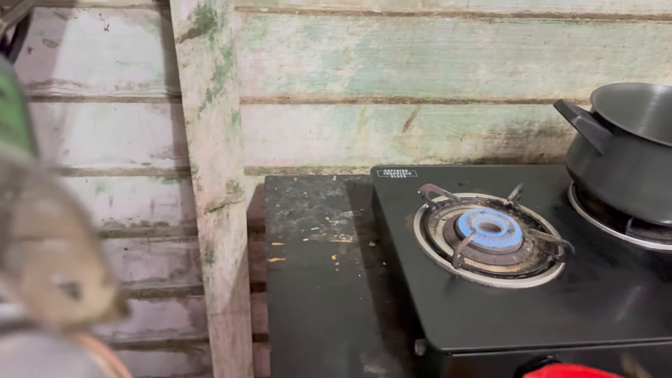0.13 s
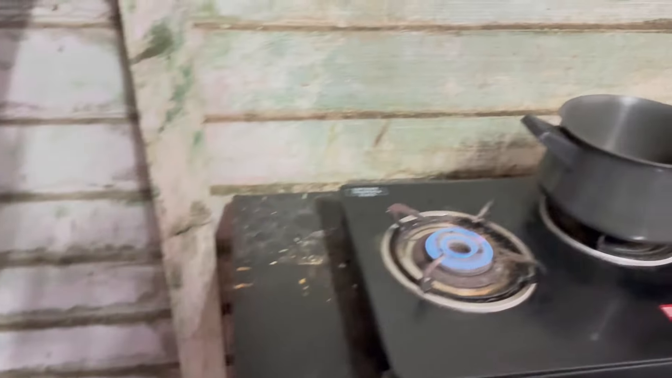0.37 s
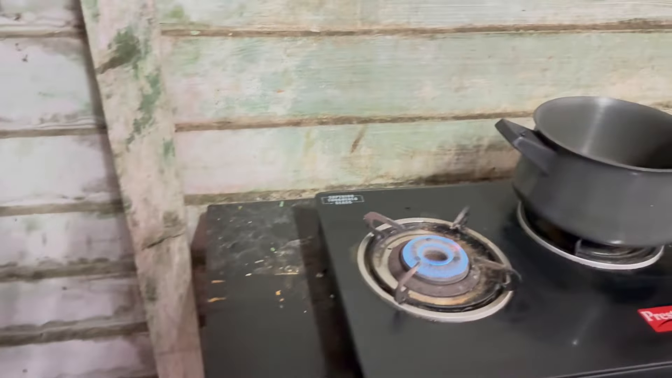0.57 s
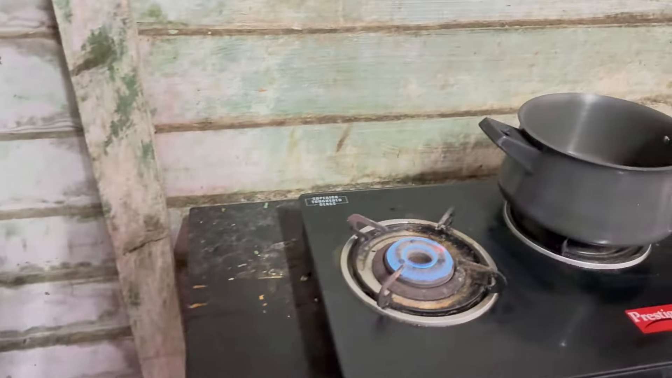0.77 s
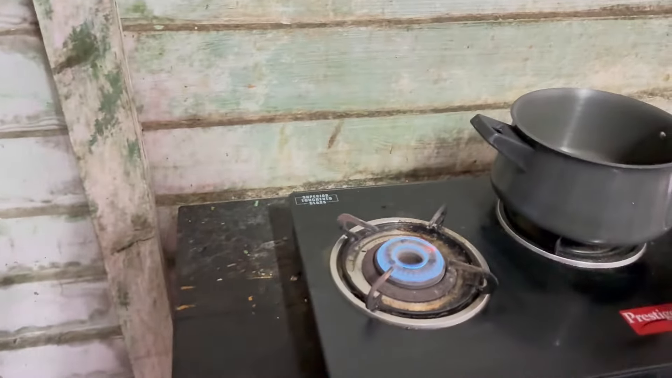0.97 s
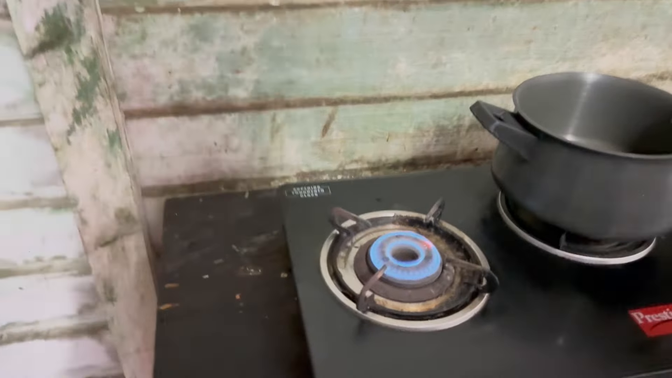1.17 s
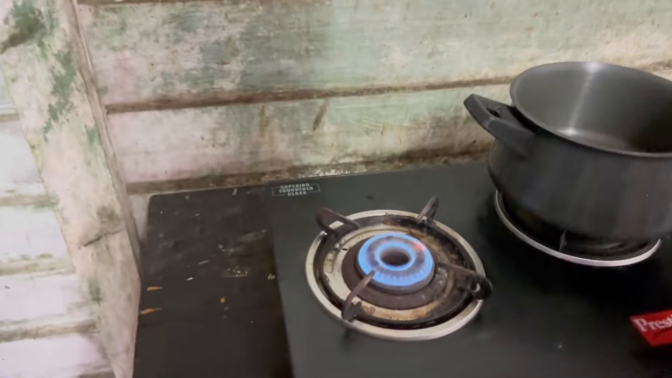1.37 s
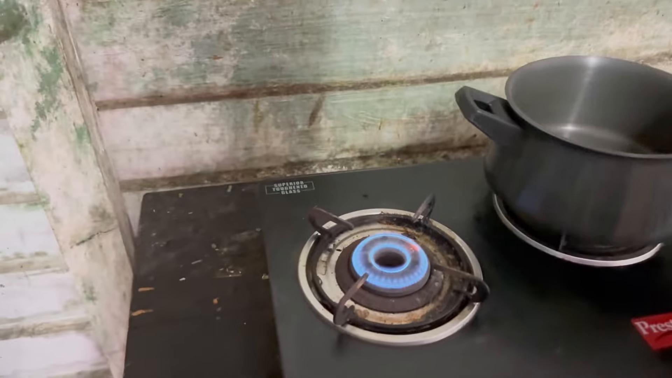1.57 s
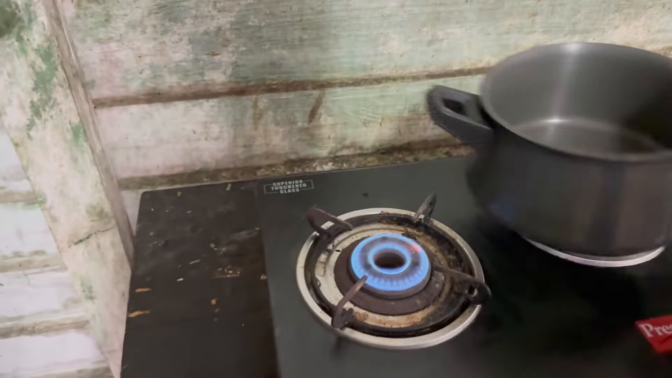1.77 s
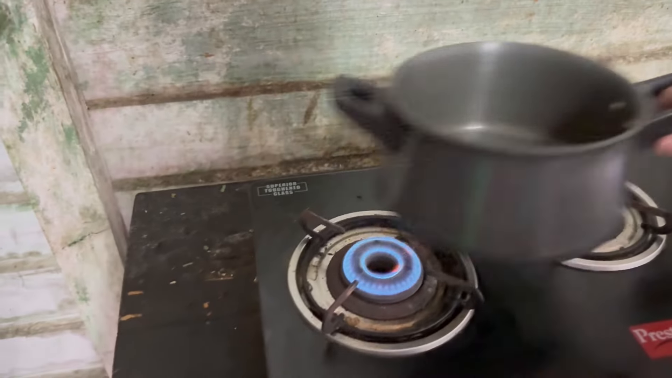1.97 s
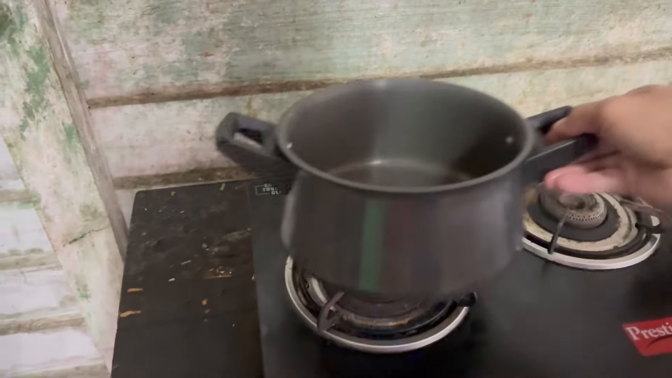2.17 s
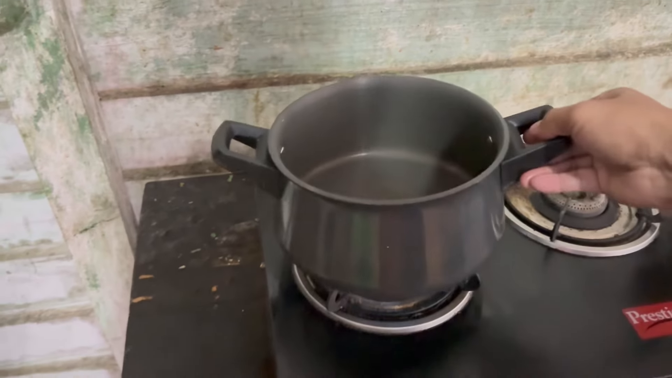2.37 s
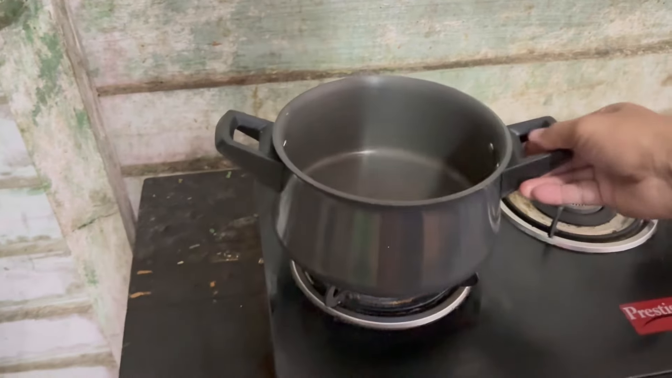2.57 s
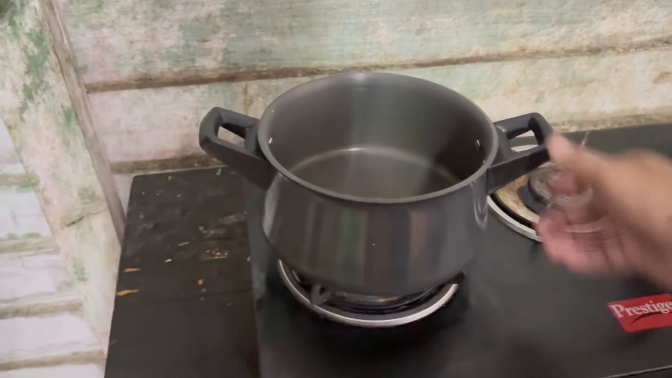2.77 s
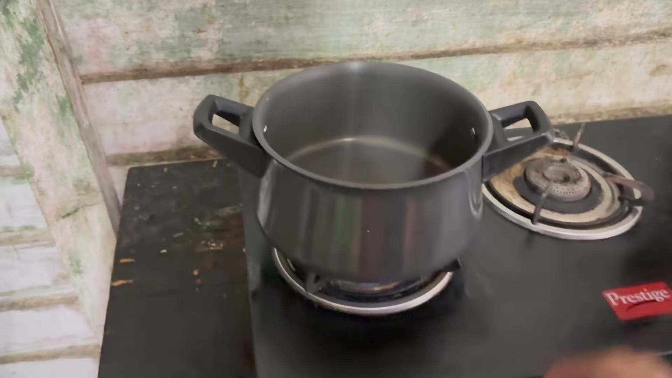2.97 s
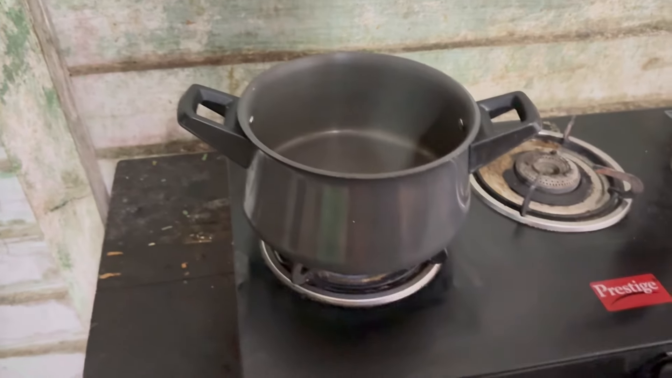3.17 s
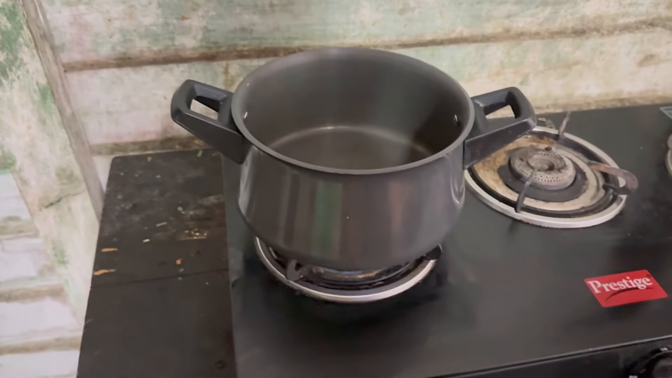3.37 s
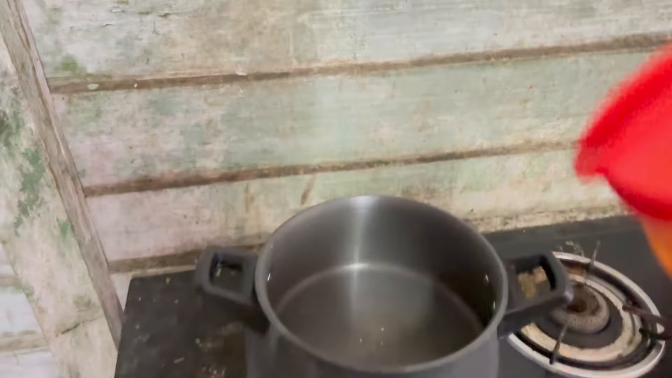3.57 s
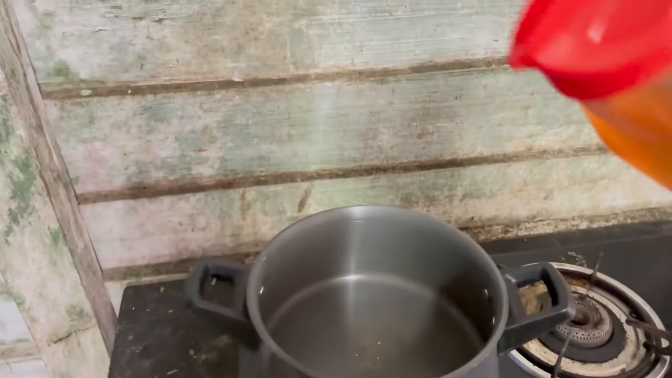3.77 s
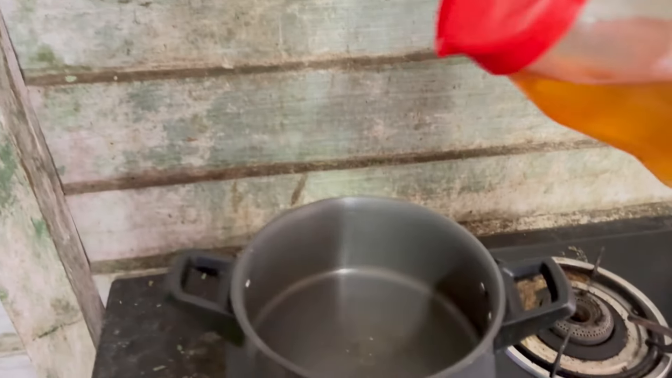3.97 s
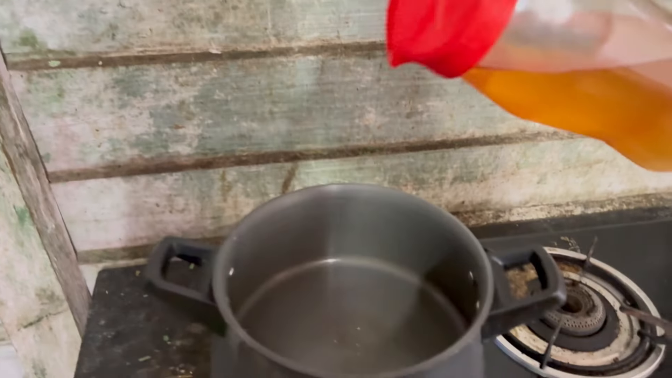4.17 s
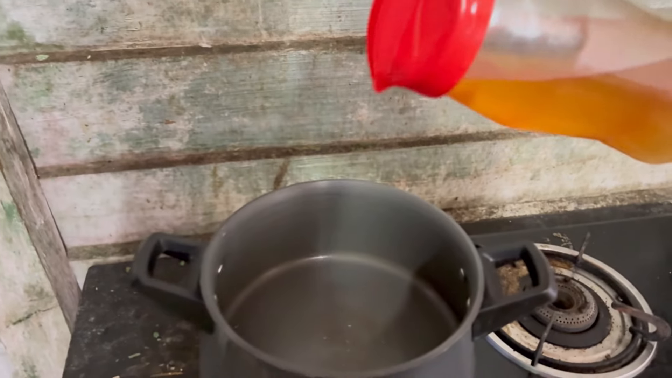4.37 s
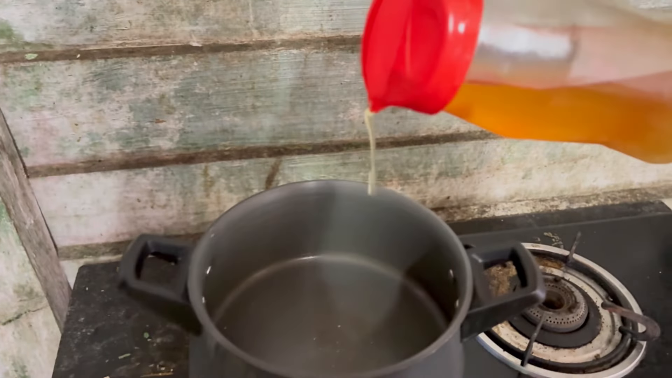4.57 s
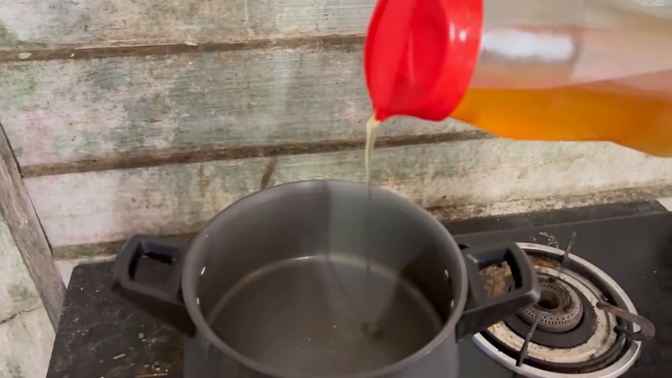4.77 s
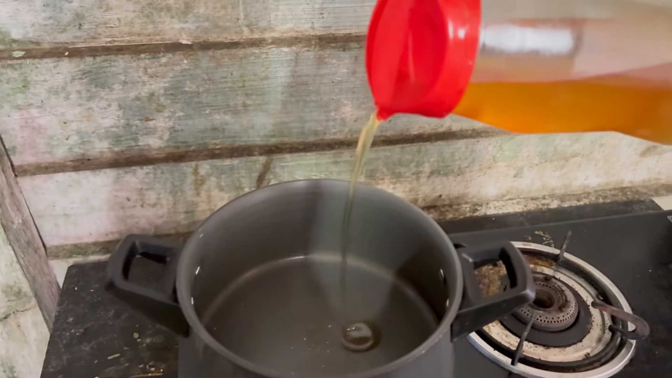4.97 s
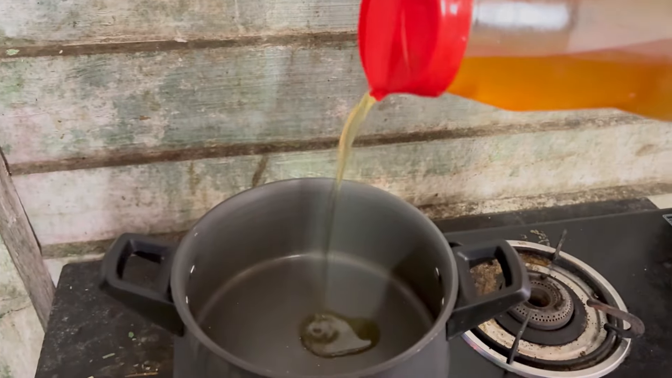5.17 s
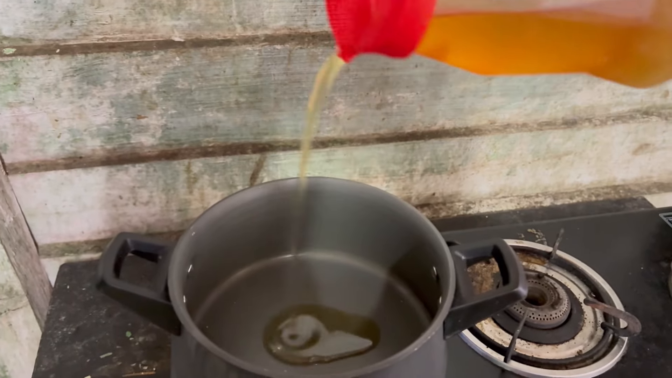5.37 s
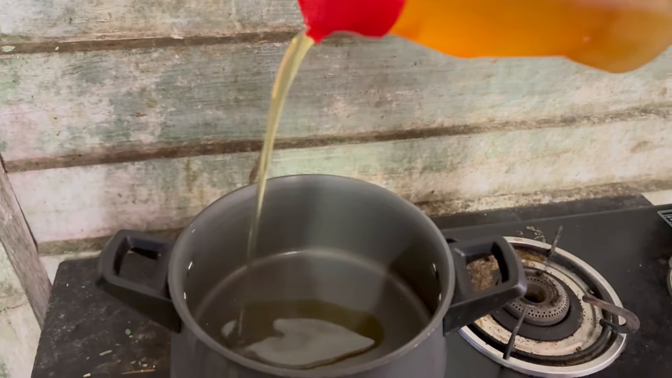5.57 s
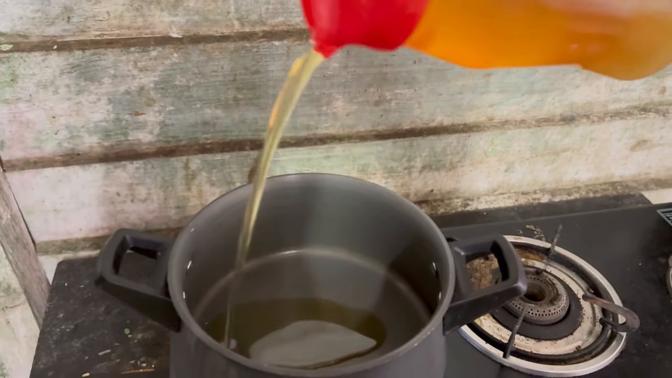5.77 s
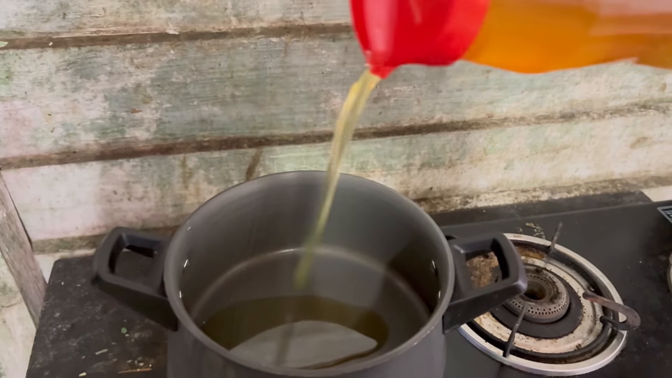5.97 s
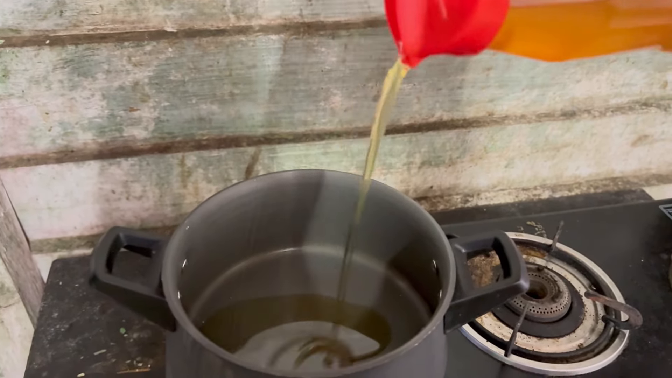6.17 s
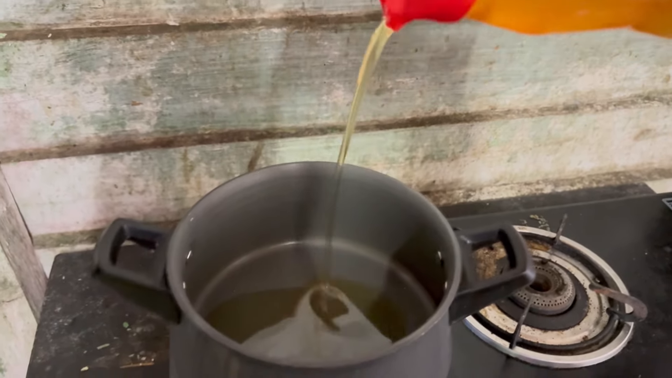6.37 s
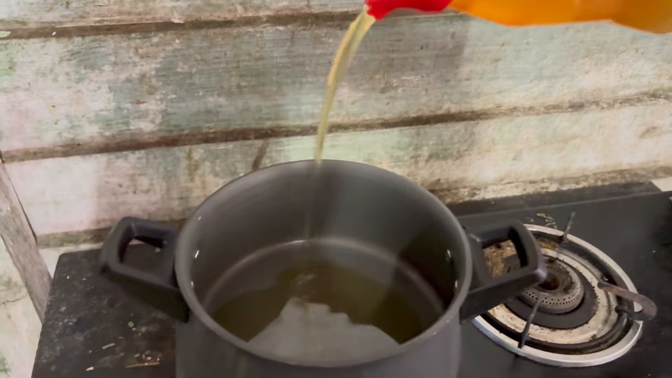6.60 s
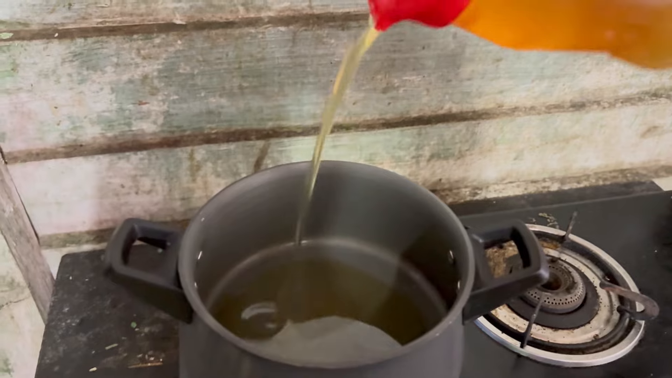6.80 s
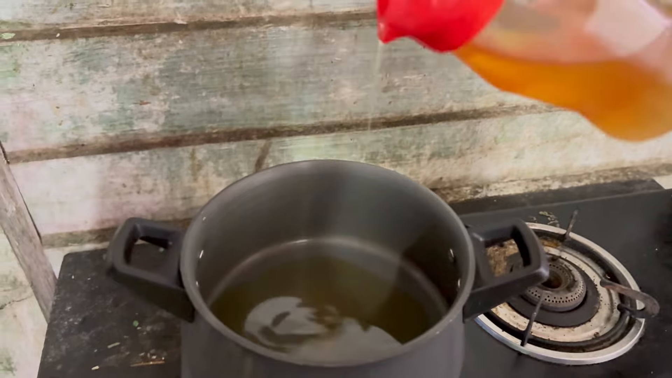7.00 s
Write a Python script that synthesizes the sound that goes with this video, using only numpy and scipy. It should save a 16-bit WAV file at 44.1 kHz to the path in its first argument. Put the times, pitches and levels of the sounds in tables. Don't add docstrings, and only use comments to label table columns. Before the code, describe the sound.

A quiet small kitchen heard close up in stereo, with faint low hum, soft handling rumble and cloth rustle. At 0.22 and 0.36 s a gas lighter hits the counter in two loud, hard knocks with low thud and brief bright rattle. Near silence follows until 1.2 s, when a metal pot scrapes its support, squeaking at 1.42-1.48, catches with a clunk and drops back at 1.6. A very faint falling whine passes around 1.7-2.3. At 2.32 the pot lands on its edge with a strong clank, then falls flat at 2.53, ringing shortly with jingling loose metal. A soft thump at 2.68 and low faint groans follow. The knob clicks at 3.31 and a weak steady gas hiss rises. From 4.37 to 5.18 a plastic bottle creaks in small, growing pops. A soft bump comes at 5.66, then a plastic snap at 6.74.

```python
import sys
import numpy as np
from scipy import signal
from scipy.fft import rfft, irfft, next_fast_len
from scipy.io import wavfile
from scipy.ndimage import uniform_filter1d

SR = 44100
rng = np.random.default_rng(int(sys.argv[2]) if len(sys.argv) > 2 else 0)


def unload_wav(signal):
    wavfile.write(
        sys.argv[1],
        SR,
        np.round(np.clip(np.atleast_2d(signal).T, -1, 1) * 32767).astype(np.int16),
    )


def volts_from_decibels(level):
    exponent = np.asarray(level, float) / 20
    return 10 ** exponent


N = 310361

LEAD_STOVE, LEAD_FRONT = 2, 0
ROUGH_WALL, ROUND_WALL = 0.017, 0.005

# (frequency [Hz], level [dB], t60 [s])
RIM_MODES = [(738, -9, 0.31), (2207, -1.5, .2)]


def evened(x):
    return x / np.sqrt(np.mean(x ** 2) + 1e-20)


def read(points, hz):
    f, value = np.transpose(points)
    return np.interp(np.log(hz + 1), np.log(f + 1), value)


def along(rows):
    s, *columns = np.transpose(rows)
    t = np.arange(N) / SR
    return [(t > s[0]) & (t < s[-1])] + [np.interp(t, s, c) for c in columns]


def arch(start, length):
    return np.sin(np.pi * np.clip((np.arange(N) / SR - start) / length, 0, 1))


def resonate(x, hz, width):
    turn = np.exp(2j * np.pi * np.cumsum(hz * np.ones(len(x))) / SR)
    r = np.exp(-np.pi * width / SR)
    return 2 * (turn * signal.lfilter([1 - r], [1, -r], x / turn)).real


def causal(tone):
    level_db = read(tone, abs(np.fft.fftfreq(4096, 1 / SR)))
    gain = np.log(volts_from_decibels(np.maximum(level_db, -90)))
    return np.fft.ifft(np.exp(gain - 1j * signal.hilbert(gain).imag)).real[:2048]


def ports(left, right, lag):
    return np.array([np.roll(left, lag), right])


def leaning(db):
    return volts_from_decibels(np.array([[db], [-db]]))


def room(x, late_db):
    # (frequency [Hz], t60 [s])
    room_t60 = [(100, 0.21), (300, 0.3), (800, .33), (2300, 0.22), (3200, 0.17), (5000, 0.095),
                (12000, 0.029)]
    # (frequency [Hz], level [dB])
    shimmer_tone = [(300, -21.5), (1500, -25), (3000, -20.5), (5500, -15.5), (9000, -25.5), (14000, -31)]
    shimmer_t60 = 0.84
    taps = np.zeros((2, SR))
    at = np.arange(150, SR - 20, 20) + rng.integers(0, 20, (2, (SR - 151) // 20))
    np.put_along_axis(taps, at, rng.choice([-1., 1.], at.shape), 1)
    hz, t, z = signal.stft(taps, SR, nperseg=256)
    fade = volts_from_decibels(-60 * t / read(room_t60, hz)[:, None])
    fade += volts_from_decibels(late_db + read(shimmer_tone, hz)[:, None] - 60 * t / shimmer_t60)
    tail = signal.istft(z * fade, SR, nperseg=256)[1]
    tail = tail / np.linalg.norm(tail[0])
    first, last = np.flatnonzero(x)[[0, -1]]
    wet = signal.oaconvolve(x[None, first:last], tail, axes=1)[:, :N - first]
    return np.pad(wet, ((0, 0), (first, N - first - wet.shape[1])))


def wash(tone, level_db, patchy_db, flicker_db):
    # (frequency [Hz], likeness [0..1])
    likeness = [(60, 0.8), (240, 0.2), (950, 0.27), (3770, 0.021), (15000, 0.038)]
    # (frequency [Hz], left over right [dB])
    lean = [(60, 23), (180, 16), (550, 4.7), (1650, 6.6), (4970, 4.8), (15000, 3.68)]
    frames, hz = N // 128 + 5, np.fft.rfftfreq(512, 1 / SR)
    a, b, c, d, patches = rng.standard_normal((frames, 257, 5)).T
    patches = evened(uniform_filter1d(uniform_filter1d(patches, 5, 0), 25, 1))
    flicker = evened(uniform_filter1d(rng.standard_normal(frames), 6))
    same = np.clip(read(likeness, hz), 0, 1)[:, None]
    left = a + 1j * b
    right = same * left + np.sqrt(1 - same ** 2) * (c + 1j * d)
    z = np.array([left, right])
    z *= volts_from_decibels(read(tone, hz)[:, None] + patchy_db * patches + flicker_db * flicker)
    z *= volts_from_decibels(np.array([.5, -.5])[:, None, None] * read(lean, hz)[:, None])
    return volts_from_decibels(level_db) * evened(signal.istft(z, nperseg=512, noverlap=384)[1][:, :N])


def blows(rows, tone, modes, lead, tick, wet_db, late_db, pans_db, wall=ROUGH_WALL):
    out, t, colour = np.zeros((3, N + SR)), np.arange(SR // 2) / SR, causal(tone)
    hz, mode_db, t60 = np.transpose(modes)[:, :, None]
    for (s, db, ring_db, rattle, freedom), pan_db in zip(rows, pans_db * np.ones(len(rows))):
        shake = rng.standard_normal(len(t)) * np.exp(-t / max(rattle, .001))
        shake[0] = tick
        crack = signal.oaconvolve(shake, colour)[:len(t)]
        crack = volts_from_decibels(db) * crack / abs(crack).max()
        split = 1 + wall * rng.standard_normal((3, len(modes), 1))
        live = t[t < 1.2 * t60.max() * freedom]
        waves = np.sin(2 * np.pi * (hz * split * live + rng.random(split.shape)))
        beat = np.sin(2 * np.pi * hz * live) + 0.44 * waves.sum(0)
        decay = volts_from_decibels(mode_db - 60 * live / (t60 * freedom))
        onset = 1 - np.exp(-live * hz / 1.5)
        ring = np.pad((decay * onset * beat).sum(0), (0, len(t) - len(live)))
        ring = volts_from_decibels(db + ring_db) * ring
        start = round(s * SR)
        out[:2, start:][:, :len(t)] += (crack + ring) * leaning(.5 * pan_db)
        out[2, start:][:len(t)] += crack + 0.099 * ring
    return ports(out[0, :N], out[1, :N], lead) + volts_from_decibels(wet_db) * room(out[2, :N], late_db)


def still_air():
    # (frequency [Hz], level [dB])
    air_tone = [(18, -52.5), (30, -25.5), (100, -7), (170, -19), (449, -25.5), (486, -35), (1280, -32.5),
                (1390, -34), (1720, -39.5), (9460, -44), (16000, -59)]
    return wash(air_tone, -62.5, 1.1, 0.403)


def stir_level():
    # (time [s], rumble level [dB])
    stir = [(0, -103), (.19, -73), (.75, -57.5), (.92, -72), (1.08, -76), (1.3, -60.5), (1.95, -65.5),
            (2.1, -75.5), (2.95, -60.5), (3.2, -80), (3.36, -62.5), (3.5, -66.5), (3.97, -60.5), (4.8, -50),
            (5.4, -63.5), (5.75, -60.5), (6.3, -69.5), (7.04, -58.5)]
    return along(stir)[1]


def sway(share):
    return volts_from_decibels(share * (stir_level() + 65.5))


def hum():
    hz, width_hz, even_s = 95.5, 22, .07
    tone = resonate(resonate(rng.standard_normal(N), hz, width_hz), hz, width_hz)
    tone = tone / np.sqrt(uniform_filter1d(evened(tone) ** 2, round(even_s * SR)) + .5)
    return volts_from_decibels(-59.5) * sway(0.18) * evened(tone) * leaning(1.4)


def handling_rumble():
    # (frequency [Hz], level [dB])
    rumble_tone = [(65, -26), (110, 3.5), (119, -6.5), (252, -3.5), (361, -17.5), (474, -10), (613, -25),
                   (800, -20.5), (1040, -50.5), (1760, -120)]
    return wash(rumble_tone, stir_level(), 3.07, 2.6)


def brushing():
    # (frequency [Hz], level per Hz [dB])
    brush_tone = [(1500, -34), (3000, -6), (4300, 5), (6000, -4), (7500, -4), (10000, -42)]
    # (start [s], length [s], level [dB])
    strokes = [
        (1.219, 0.15, -76.5),
        (1.38, 0.088, -82),
        (2.24, 0.16, -72.5),
        (2.622, 0.46, -72),
        (3.7, 0.44, -86.5),
        (4.034, 0.85, -75.5),
        (4.99, 0.19, -75),
        (6.734, 0.087, -75),
    ]
    swell = sum(volts_from_decibels(db) * arch(start, length) for start, length, db in strokes)
    return swell * wash(brush_tone, 0, 1.3, 2.5)


def flame_and_rustles():
    # (frequency [Hz], level [dB])
    roar_tone = [(290, -34.5), (500, -5), (802, -2.5), (1030, -6), (1560, -2.5), (2430, -16), (3930, -24),
                 (5000, -24.5), (6500, -48), (11000, -120)]
    hiss_tone = [(2000, -59), (3000, -27), (6500, -14), (8000, -5.5), (11000, 4), (14500, -1.5),
                 (15500, -5), (16300, -48)]
    # (start [s], length [s], roar level [dB], hiss level [dB])
    rustles = [
        (0.601, 0.4, -99.5, -83.5),
        (1.219, 0.16, -76, -76),
        (1.375, 0.25, -64, -79),
        (1.789, 0.37, -80, -100),
        (2.299, 0.094, -49.5, -77.5),
        (2.798, 0.24, -79, -74.5),
        (3.7, 0.54, -68, -74),
        (4.088, 0.71, -67, -73),
        (5.629, .25, -80, -92),
    ]
    turn_up_s, rise_s = 3.357, 0.14
    up = np.clip((np.arange(N) / SR - turn_up_s) / rise_s, 0, 1)
    roar = (volts_from_decibels(-88.5) + up * volts_from_decibels(-75)) * sway(0.1)
    hiss = up * volts_from_decibels(-68.5)
    for start, length, roar_db, hiss_db in rustles:
        swell = arch(start, length)
        roar = np.hypot(roar, volts_from_decibels(roar_db) * swell)
        hiss = np.hypot(hiss, volts_from_decibels(hiss_db) * swell)
    return roar * wash(roar_tone, 0, 0.8, 0.34) + hiss * wash(hiss_tone, 0, 0.32, 0.92)


def whine():
    start_s, length_s, top_hz, fall_hz_per_s = 1.7, .66, 1312, 440
    hz = top_hz - fall_hz_per_s * np.clip(np.arange(N) / SR - start_s, 0, length_s)
    swell = np.sqrt(abs(arch(start_s, length_s))) * (hz / top_hz) ** 5
    fuzz = evened(resonate(resonate(rng.standard_normal(N), hz, 30.0), hz, 40.0))
    return swell * volts_from_decibels(-78) * (np.sin(2 * np.pi * np.cumsum(hz) / SR) + .65 * fuzz)


def groan():
    # (start [s], length [s], top frequency [Hz], level [dB])
    groans = [
        (2.661, 0.17, 330, -60.5),
        (2.883, 0.36, 293.5, -57),
        (3.257, 0.17, 360, -62.5),
        (5.631, 0.27, 297, -60.5),
    ]
    out = np.zeros(N + SR)
    for start, length, top_hz, db in groans:
        swell = np.sin(np.pi * np.arange(0, length, 1 / SR) / length)
        hz = top_hz * (1 - 0.016 * (1 - swell))
        noise = rng.standard_normal(SR // 2)[:len(swell)]
        tone = evened(resonate(resonate(noise, hz, 60.0), hz, 74.0))
        out[round(start * SR):][:len(noise)] += swell * volts_from_decibels(db) * tone
    return out[:N] * leaning(1.2)


def thuds():
    # (time [s], peak [dB], frequency [Hz], rise [s], t60 [s])
    swings = [(0.223, -24, 150, 0.0044, 0.23), (0.233, -35, 82.6, 0.017, 0.13),
              (0.367, -23, 151.7, 0.0037, 0.11), (.37, -34, 77.8, 0.014, 0.21),
              (1.49, -27, 150, 0.041, 0.12), (1.499, -28.5, 119.4, 0.018, 0.15),
              (1.61, -28, 115.5, 0.026, 0.24), (1.616, -37.5, 160.7, 0.015, 0.2),
              (2.329, -18, 150, 0.012, 0.15), (2.326, -24.5, 113, 0.012, 0.31),
              (2.331, -31.5, 70.5, 0.03, 0.18), (2.54, -24.5, 143.4, 0.0077, 0.2),
              (2.541, -27, 74, 0.017, 0.3), (4.778, -40, 255, 0.0025, 0.025),
              (6.7456, -37, 139.4, 0.0072, 0.056)]
    out, t = np.zeros(N + SR), np.arange(SR // 2) / SR
    settling = t - .002 * np.exp(-t / .04)
    for s, db, hz, rise, t60 in swings:
        swell = (1 - np.exp(-t / rise)) ** 2 * volts_from_decibels(-60 * t / t60)
        out[round(s * SR):][:len(t)] += volts_from_decibels(db) * swell / swell.max() * np.sin(2 * np.pi * hz * settling)
    return out[:N] * leaning(1.3) + volts_from_decibels(-8.0) * room(out[:N], -10.5)


def ticks_and_thumps():
    # (time [s], peak [dB], left over right [dB])
    ticks = [(0.8536, -71, -10), (1.229, -48, 5.5), (1.282, -57, -1), (1.526, -51, -10), (1.532, -33.5, -4),
             (1.535, -40, 9), (1.548, -49, 0), (1.604, -49, -6), (1.621, -39.5, 0), (1.639, -40, 5),
             (2.9297, -59, 20), (4.2507, -42.5, -9.5), (4.716, -47.5, 8), (5.078, -46, 0.5)]
    # (time [s], peak [dB], ring over peak [dB], rattle [s], freedom to ring [share of t60])
    thumps = [
        (2.684, -40, -1.3, 0.01, 0.72),
        (5.659, -54, -1.8, 0.0078, 0.93),
    ]
    # (frequency [Hz], level per Hz [dB])
    tick_tone = [(710, -23), (1500, -7), (9820, -8.5), (11400, -6), (12300, -19), (13600, -7.5),
                 (16000, -24)]
    thump_tone = [(71, -75), (120, -21), (333, 2), (534, -5.5), (654, -33), (741, -25), (1200, -43),
                  (1560, -25), (2640, -120)]
    # (frequency [Hz], level [dB], t60 [s])
    hollow_modes = [(150, 6, 0.083), (319, 8.5, 0.036), (680, -6.5, 0.04), (2030, -17, 0.035)]
    rows = [(s, db, -47, 0.0028, 0.29) for s, db, pan_db in ticks]
    pans_db = np.transpose(ticks)[-1]
    out = blows(rows, tick_tone, hollow_modes, LEAD_STOVE, 5.4, -2.0, -23.0, pans_db)
    return out + blows(thumps, thump_tone, hollow_modes, LEAD_STOVE, 7.3, 2.5, -27.0, .6)


def knob():
    # (time [s], peak [dB], ring over peak [dB], rattle [s], freedom to ring [share of t60])
    clicks = [
        (3.308, -40, -15, 0.0044, 0.61),
        (3.317, -55.5, -5.5, 0.0025, 0.89),
    ]
    # (frequency [Hz], level per Hz [dB])
    knob_tone = [(200, -28), (400, -2.5), (800, -4.5), (1500, -8), (2400, -9), (3200, -2.5), (4500, -18),
                 (11000, -17), (16000, -54)]
    # (frequency [Hz], level [dB], t60 [s])
    knob_modes = [(330, 8, 0.046), (810, 11, .06), (1160, 3.3, 0.022), (3350, 2.3, 0.035)]
    return blows(clicks, knob_tone, knob_modes, LEAD_STOVE, 1.63, -4.0, 0.0, 2.7)


def oil_bottle():
    # (time [s], peak [dB])
    pops = [(4.371, -55), (4.414, -46), (4.442, -46), (4.471, -51), (4.497, -46), (4.523, -45),
            (4.609, -39), (4.654, -39), (4.684, -49), (4.7088, -37), (4.8143, -34.5), (4.851, -38),
            (4.9408, -35), (5.0768, -34), (5.175, -57)]
    # (time [s], peak [dB], ring over peak [dB], rattle [s], freedom to ring [share of t60])
    snap = [
        (6.7394, -27.5, -1, 0.0032, 0.5),
    ]
    # (frequency [Hz], level per Hz [dB])
    soft_tone = [(180, -20), (350, -2), (700, 1), (1400, 0), (2200, -8), (3000, -22), (6500, -40),
                 (16000, -65)]
    creak_tone = [(180, -23), (350, -4), (700, 1), (1400, 2), (2200, 1.5), (2900, -9), (3900, -23),
                  (6500, -38), (16000, -65)]
    snap_tone = [(180, 7), (300, 3), (725, -1), (2030, -4), (4200, -16.5), (5340, -26), (8640, -24.5),
                 (9550, -19.5), (14000, -35.5), (16000, -29)]
    # (frequency [Hz], level [dB], t60 [s])
    wall_modes = [(150, -4, 0.073), (329, -15, 0.056), (704, -8, 0.021), (2080, -25, 0.036)]
    creaks = [(s, db, 4.5, .0022, 0.96) for s, db in pops]
    soft = 6
    out = blows(creaks[:soft], soft_tone, wall_modes, LEAD_FRONT, 12., -11.0, 7.4, 2.0)
    out += blows(creaks[soft:], creak_tone, wall_modes, LEAD_FRONT, 12., -10.5, 6.1, 2.5)
    return out + blows(snap, snap_tone, wall_modes, LEAD_FRONT, 9.7, -9.0, 7.3, 0.85)


def jingle():
    # (time [s], peak [dB], ring over peak [dB], rattle [s], freedom to ring [share of t60])
    jingles = [
        (.2245, -35.5, -60, 0.038, .3),
        (.365, -36, -60.5, .035, 0.33),
        (2.325, -39.5, -57.5, 0.022, .3),
        (2.336, -37, -52, 0.029, .3),
        (2.347, -36, -60, .02, .3),
        (2.535, -32, -60, 0.027, 0.26),
        (2.572, -43, -60, .02, .3),
    ]
    # (frequency [Hz], level per Hz [dB])
    jingle_tone = [(2000, -40), (4000, -9.5), (5500, -11.5), (7500, -0.5), (11000, -2), (14500, -5),
                   (16400, -15)]
    return blows(jingles, jingle_tone, RIM_MODES, LEAD_STOVE, 2., -11.5, -7.0, 0.97)


def lighter():
    # (time [s], peak [dB], ring over peak [dB], rattle [s], freedom to ring [share of t60])
    first = [
        (.2243, -6.5, -12.5, 0.004, 0.84),
        (.2435, -20, -6.5, 0.0037, 0.63),
    ]
    second = [
        (.3595, -37, 1, 0.0056, 0.89),
        (.3642, -8.5, -3.5, 0.0022, 0.47),
        (.372, -21, -12.5, 0.013, 0.67),
    ]
    # (frequency [Hz], level per Hz [dB])
    first_tone = [(120, -29.5), (200, -5.5), (420, 0), (600, 0.5), (1000, -5), (1450, -5), (1900, -21),
                  (3000, -22.5), (5200, -35.5), (8000, -23.5), (14500, -35), (16000, -53.5)]
    second_tone = [(120, -24), (200, -5), (550, -5), (1000, -6), (1420, -8.5), (1800, -9.5), (2400, -15.5),
                   (2800, -29), (3830, -27), (9060, -35), (10500, -28), (14900, -44), (16000, -54.5)]
    # (frequency [Hz], level [dB], t60 [s])
    first_modes = [(406, -14, 0.32), (535, -8, 0.13), (1192, 10.5, 0.035), (635, -6.5, 0.046),
                   (1090, -13.5, 0.1), (1370, -13.5, .2), (1550, -19, 0.1), (5840, -21.5, 0.046),
                   (8000, -15, 0.0072)]
    second_modes = [(377, -16.5, .27), (538, -12.5, 0.24), (596.8, -19, .25), (728.2, -18, 0.2096),
                    (835, -14.5, 0.3015), (1000, -23.5, 0.298), (1217, -20, .3), (1470, -15.5, 0.22),
                    (1659, -18, 0.38), (1810, -15, .16), (1973, -21.5, 0.49), (2065, 10, 0.03),
                    (2223, 8.5, .035), (2430, -26, 0.2)]
    out = blows(first, first_tone, first_modes, 7, 3.0, -2.3, -1.2, 0.97)
    return out + blows(second, second_tone, second_modes, 4, 1.9, 1.2, -2.5, -2.7)


def pot_drag():
    # (time [s], scrape level [dB], squeak level [dB])
    rubbing = [(1.22, -94.5, -92), (1.229, -76.5, -93), (1.26, -82, -92.5), (1.279, -71.5, -92),
               (1.33, -73.5, -90), (1.345, -85, -100), (1.383, -80, -100), (1.392, -69, -100),
               (1.412, -69.5, -69.5), (1.425, -71, -49), (1.443, -76, -45), (1.47, -89, -47),
               (1.48, -54.5, -55)]
    # (frequency [Hz], level [dB])
    scrape_tone = [(120, -24), (200, -11), (249, -10), (380, -16.5), (473, -14.5), (1480, -27), (1810, -22),
                   (2700, -44), (8120, -30), (14300, -39.5), (16000, -62)]
    # (frequency [Hz], width [Hz], level [dB])
    base_rings = [(1203, 90, -9), (1920, 120, -9), (2600, 200, -13), (4300, 120, -13), (8250, 500, -2)]
    # (time [s], frequency [Hz])
    squeak_pitch = [(1.2, 742), (1.42, 759.6), (1.45, 792), (1.48, 680)]
    on, db, squeak_db = along(rubbing)
    unevenness = uniform_filter1d(rng.standard_normal(N), 200) * np.sqrt(200)
    slips = rng.standard_normal(N) * volts_from_decibels(3.5 * unevenness)
    scrape = evened(signal.oaconvolve(slips, causal(scrape_tone))[:N])
    for hz, width, ring_db in base_rings:
        scrape = scrape + volts_from_decibels(ring_db - 10) * evened(resonate(slips, hz, width))
    hz = along(squeak_pitch)[1]
    fuzz = resonate(rng.standard_normal(N), hz, 60.)
    squeak = np.sin(2 * np.pi * np.cumsum(hz) / SR) + 0.42 * evened(fuzz)
    scrape, squeak = on * volts_from_decibels(db + 4.5) * scrape, on * volts_from_decibels(squeak_db) * squeak
    direct = scrape + squeak
    return ports(direct, direct, LEAD_STOVE) + volts_from_decibels(4.0) * room(scrape + 0.3 * squeak, 4.6)


def pot_lift():
    # (time [s], peak [dB], ring over peak [dB], rattle [s], freedom to ring [share of t60])
    lift = [
        (1.484, -23.5, 0.24, 0.018, 0.53),
        (1.534, -33, 0, 0.0041, 0.25),
    ]
    drop = [
        (1.604, -24.5, -8.5, 0.023, 0.97),
        (1.641, -39.5, 0.5, 0.01, 0.86),
    ]
    # (frequency [Hz], level per Hz [dB])
    lift_tone = [(180, -10.5), (300, 4.5), (750, -5), (1500, -6), (2300, -18.5), (4000, -25), (6500, -41),
                 (8000, -24), (14000, -48), (16000, -58)]
    drop_tone = [(180, -8), (250, 3.5), (800, -9), (1100, -14.5), (2300, -23.5), (4000, -38), (6500, -48),
                 (8000, -30), (14000, -40), (16000, -49)]
    # (frequency [Hz], level [dB], t60 [s])
    lifted_modes = [(354, -29.5, 0.81), (760, -2.5, 0.09), (910, -39, 0.044), (1468, -15, 0.22),
                    (2227, -17.5, 0.3), (3840, -25, 0.068), (3350, -30, 0.23), (6200, -25.5, 0.18)]
    dropped_modes = [(358, -32, 0.81), (745, -1, 0.17), (1090, -31, 0.18), (1260, -27, .2),
                     (1446, -14, 0.33), (2203, -13, 0.24), (3920, -27.5, 0.17), (4540, -38, 0.18),
                     (6140, -27, 0.12)]
    out = blows(lift, lift_tone, lifted_modes, LEAD_STOVE, 2.3, -8.0, 13.0, 1.0)
    return out + blows(drop, drop_tone, dropped_modes, LEAD_STOVE, 4., -10.5, -4.0, 0.94, ROUND_WALL)


def pot_set_down():
    # (time [s], peak [dB], ring over peak [dB], rattle [s], freedom to ring [share of t60])
    edge = [
        (2.3235, -12, 0.69, 0.0067, 1),
        (2.342, -28, 0.5, 0.0071, 0.49),
        (2.355, -25, 8, .006, .7),
    ]
    flat = [
        (2.533, -14, 0.5, 0.0125, 0.92),
        (2.547, -17, 4.5, 0.0097, 1),
    ]
    swells = [
        (2.575, -53, 8, .004, 1),
        (2.603, -51, 9, .004, .9),
    ]
    # (frequency [Hz], level per Hz [dB])
    edge_tone = [(120, -23.5), (200, -8.5), (400, -9.5), (590, -14), (735, -14.5), (836, -14.5),
                 (1250, -14), (1910, -15.5), (2400, -20.5), (3500, -21.5), (4680, -26.5), (9400, -34),
                 (11500, -30), (16000, -53)]
    flat_tone = [(120, -51), (200, -6.5), (400, -9), (671, -14), (749, -3.5), (851, -10.5), (1140, -10.5),
                 (1910, -16.5), (2210, -14), (4200, -24), (7830, -23), (12400, -26), (14300, -42),
                 (16000, -54.5)]
    # (frequency [Hz], level [dB], t60 [s])
    tilted_modes = [(270.7, -20.5, .3), (750, -20, 0.24), (740, -24, 0.54), (1240, -30.5, .3),
                    (1450, -19, 0.24), (2090, -16.5, .07), (2202, -28.5, 0.28), (2280, -16, .08),
                    (3020, -35, 0.18), (4590, -30.5, 0.26), (5800, -44, .15), (7750, -35, 0.16),
                    (11100, -43, .1)]
    flat_modes = [(270.4, -25, .3), (523, -23, 0.28), (751, -12, 0.23), (745, -24, 0.47),
                  (1180.6, -16, .15), (1580, -23, .15), (1810, -21.5, .12), (2075, -49.5, .8),
                  (2205, -9, 0.045), (2190, -25.5, .26), (2990, -21, 0.11), (3386, -14, 0.061),
                  (4425, -38, .3), (7530, -11.5, .09)]
    out = blows(edge, edge_tone, tilted_modes, LEAD_STOVE, 2.7, -3.0, -1.93, 0.86, ROUND_WALL)
    out += blows(flat, flat_tone, flat_modes, LEAD_STOVE, 1.4, -6.5, 0.87, 3.2, ROUND_WALL)
    return out + blows(swells, flat_tone, RIM_MODES, LEAD_STOVE, 2.7, -12.0, -10.5, 2.5, ROUND_WALL)


def scene():
    background = still_air() + hum() + handling_rumble() + brushing() + flame_and_rustles()
    stove = whine() + groan() + thuds() + ticks_and_thumps() + knob()
    objects = oil_bottle() + jingle() + lighter()
    pot = pot_drag() + pot_lift() + pot_set_down()
    return background + stove + objects + pot


def top_cut(x):
    return signal.sosfilt(signal.butter(12, 16510, fs=SR, output="sos"), x)


def record(dry):
    # (frequency [Hz], width [Hz], depth [dB])
    notches = [(9450, 300, -14), (12600, 600, -14)]
    bass_hz, treble_hz, lag_s, turn_rad = 450, 7890, .33e-3, 3.8
    size = next_fast_len(N)
    hz, (left, right) = np.fft.rfftfreq(size, 1 / SR), rfft(dry, size)
    band = 1 / (1 + (33 / (hz + 1)) ** 8) / (1 + (hz / 16300) ** 60)
    for notch_hz, width_hz, notch_db in notches:
        band = band * volts_from_decibels(notch_db * np.exp(-((hz - notch_hz) / width_hz) ** 4))
    bass = .85 / (1 + (hz / bass_hz) ** 4)
    middle = (left + right) / 2
    left = left + bass * (1.13 * middle - left)
    right = right + bass * (.88 * middle - right)
    treble = 1 / (1 + (treble_hz / (hz + 1)) ** 6)
    late_right = right * np.exp(1j * (turn_rad - 2 * np.pi * hz * lag_s))
    left = np.sqrt(1 - treble ** 2) * left + treble * late_right
    mix = irfft(np.array([left, right]) * band, size)[:, :N]
    return top_cut(mix)


dry = scene()
out = record(dry)
unload_wav(out)
```